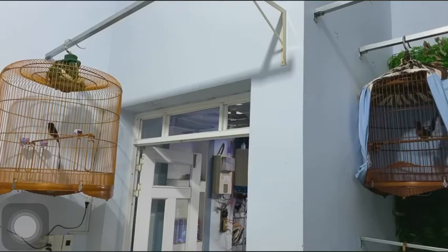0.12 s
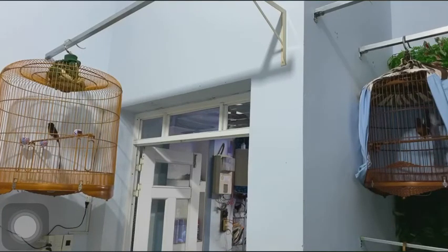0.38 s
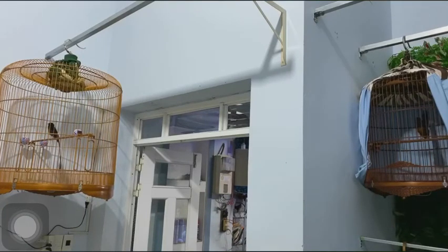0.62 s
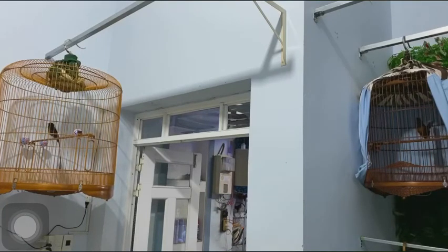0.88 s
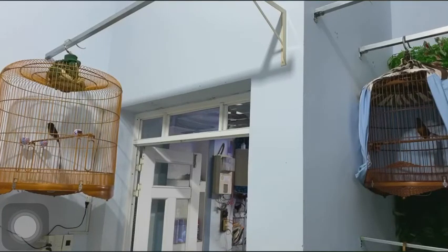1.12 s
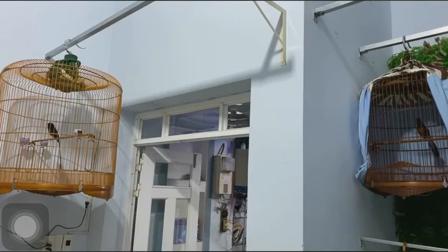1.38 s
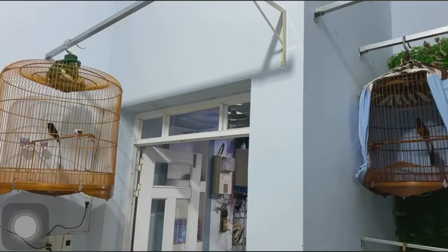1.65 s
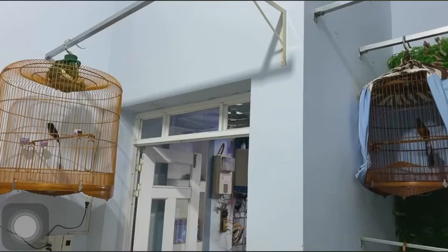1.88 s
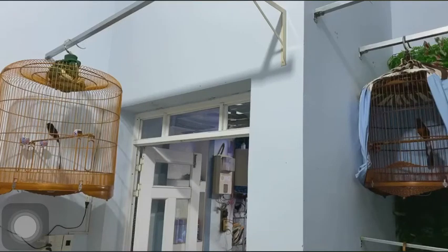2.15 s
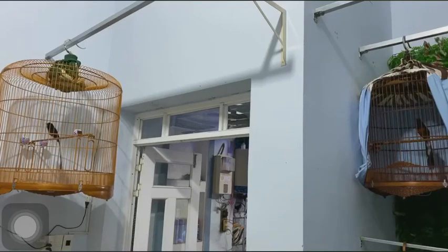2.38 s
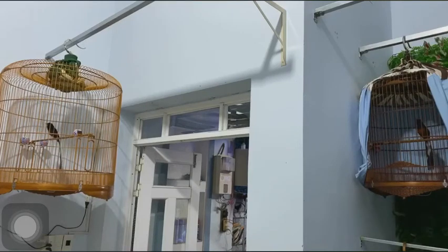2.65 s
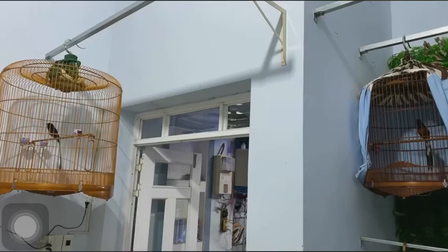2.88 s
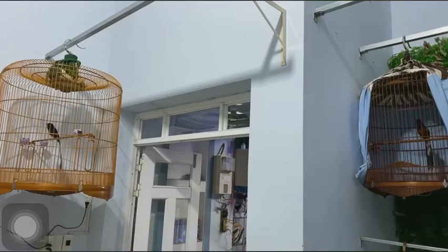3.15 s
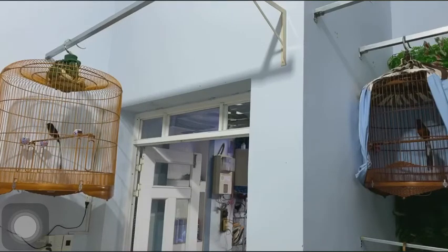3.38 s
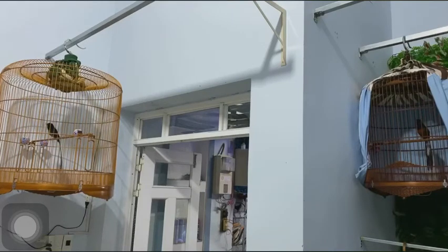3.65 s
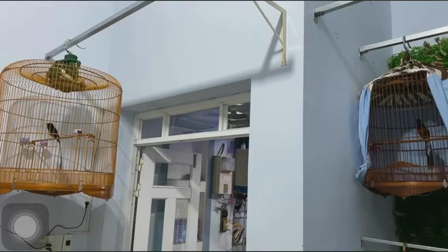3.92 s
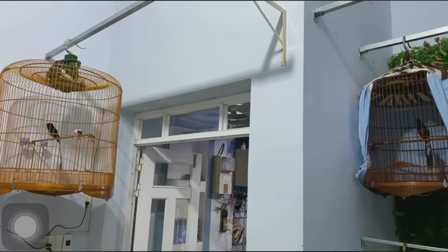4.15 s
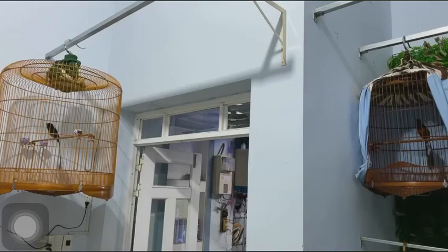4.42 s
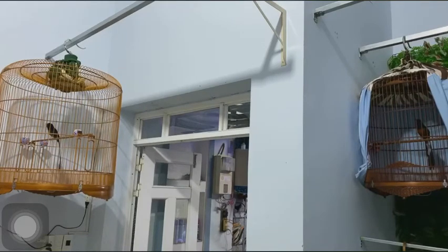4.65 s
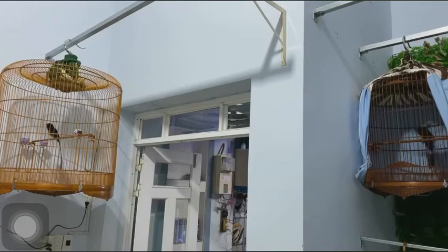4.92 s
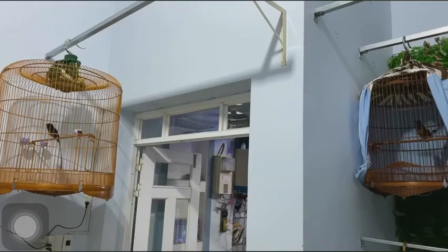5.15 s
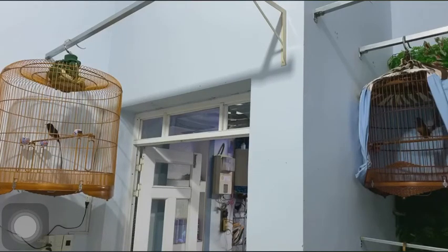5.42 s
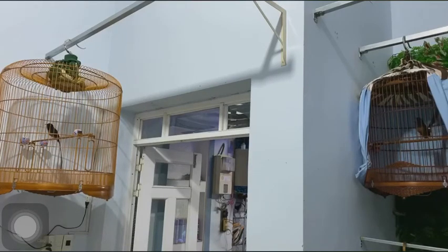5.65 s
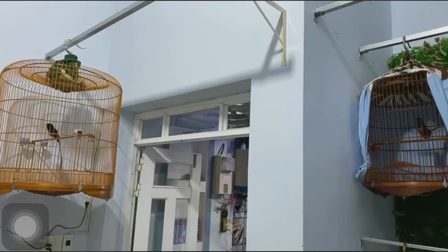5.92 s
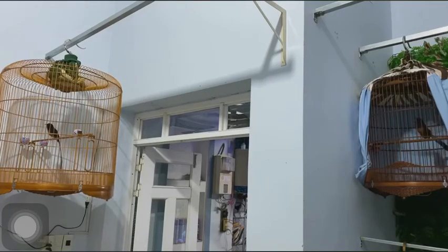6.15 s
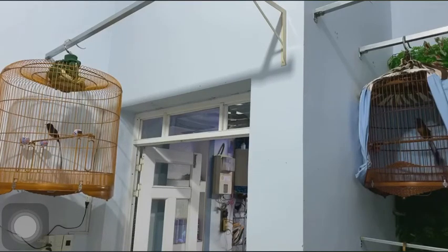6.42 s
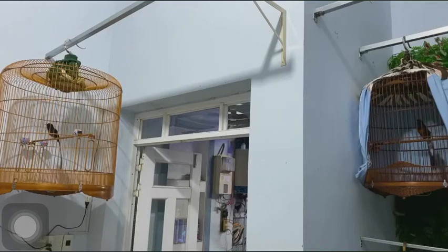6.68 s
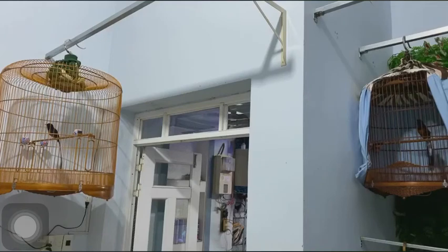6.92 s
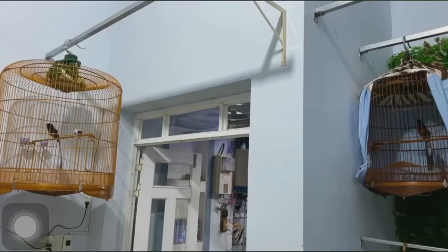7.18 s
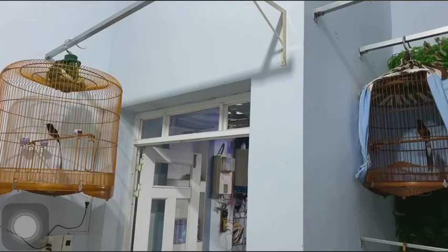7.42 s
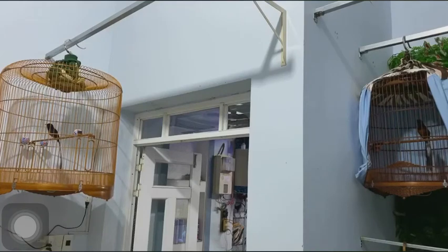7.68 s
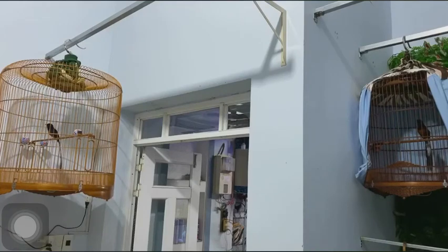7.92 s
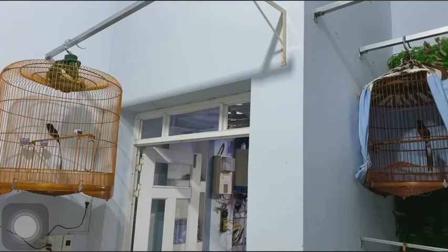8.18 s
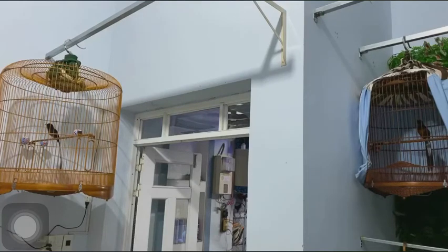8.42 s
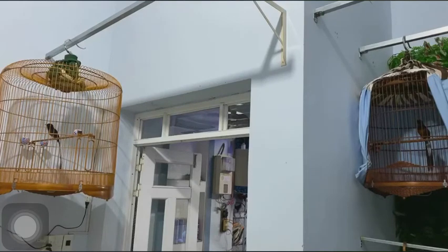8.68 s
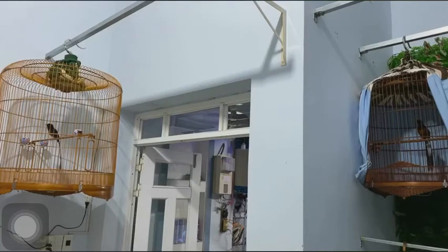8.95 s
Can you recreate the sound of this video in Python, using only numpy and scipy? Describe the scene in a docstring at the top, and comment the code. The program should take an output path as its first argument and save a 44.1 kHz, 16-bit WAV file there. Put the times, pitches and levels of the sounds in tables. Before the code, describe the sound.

Fast whistled birdsong fills an echoing courtyard, at first mostly mid-pitched chirps and downward slides, later sharper squeaks and harsh churrs. The song thins as a single loud dog bark bounces off the walls, then picks up again with tumbling whistles and rasps. Uneven hollow panel knocks close the scene. Street rumble, distant birds and faint high hiss lie beneath, heard from some distance.

```python
"""Caged songbirds in a hard-walled yard

Gliding sines make the whistles, stacks of partials the nasal notes and sweeps, chopped noise the churrs;
echoes and a tail smear them. A dog barks once as a stack shaped by its muzzle, and six blows ring the
modes of a hollow panel. Banded noise makes the farther birds, the engine drone and traffic in the street,
and a thin high hiss that comes and goes."""
import sys
import numpy as np
from scipy import signal
from scipy.fft import rfft, irfft, next_fast_len
from scipy.io import wavfile
from scipy.ndimage import map_coordinates

SR = 44100
rng = np.random.default_rng(int(sys.argv[2]) if len(sys.argv) > 2 else 0)


def store_wav(level_fs):
    """Save 16-bit WAV to argv[1]."""
    pcm = np.round(np.clip(np.atleast_2d(level_fs), -1, 1) * 32767)
    wavfile.write(sys.argv[1], SR, pcm.T.astype(np.int16))


def nominal_scale(level):
    """Amplitude ratio for a level in decibels (scalar or array-like)."""
    x = np.asarray(level, float) / 20
    return 10 ** x


N = 399546

ATTACK_S, RELEASE_S = 0.006, 0.0056  # soft edges of a whistle


def unit(x):
    """Scaled to rms 1."""
    return x / np.sqrt(np.mean(x ** 2) + 1e-20)


def along(points, hz):
    """(Hz, value) points read on a log frequency axis."""
    f, v = np.transpose(points)
    return np.interp(np.log(hz + 1), np.log(f + 1), v)


def wobble(rate, size=N):
    """A smooth random curve, rate knots a second."""
    knots = rng.standard_normal(int(size * rate / SR) + 4)
    return map_coordinates(knots, [np.arange(size) * rate / SR])


def filtered(x, response):
    """x times a response of frequency."""
    m = next_fast_len(len(x) + 8192)
    return irfft(rfft(x, m) * response(np.fft.rfftfreq(m, 1 / SR)), m)[:len(x)]


def resonance(hz, centre_hz, width_hz):
    """Complex gain of one resonance, 1 at its centre."""
    return 1j * hz * width_hz / (centre_hz ** 2 - hz ** 2 + 1j * hz * width_hz + 1e-9)


def swell(t, length, edge):
    """Soft start and soft end of a sound."""
    return np.clip(np.minimum(t, length - t) / edge, 0, 1) ** 2


def add(track, s, sound):
    """Mix a sound in at s seconds."""
    part = track[max(round(s * SR), 0):][:len(sound)]
    part += sound[:len(part)]


def shake(s, t):
    """Pitch swing of a voice that starts at s: a fast uneven shake, deep in rattling passages."""
    # how much the voices rattle: (time [s], depth ahead of the two swing gains [Hz])
    rattle = [(0, 87.5), (2.5, 91), (2.8, 70), (4.5, 81), (4.58, 40), (5.3, 69.4), (5.5, 25), (6.4, 25),
              (6.6, 132), (7.05, 120), (7.1, 46), (7.3, 45), (7.4, 129), (7.9, 133), (8.05, 40), (8.55, 40),
              (8.7, 90)]
    depth_hz = np.interp(s + t, *np.transpose(rattle))
    beat_hz = 70 * (1 + 0.4 * wobble(40, size=len(t)))
    beat = np.sin(2 * np.pi * np.cumsum(beat_hz) / SR + rng.uniform(0, 2 * np.pi))
    return depth_hz * (0.77 * beat + 0.607 * wobble(150.2, size=len(t)))


def whistle(s, glide, db):
    """A gliding, slightly unsteady sine with two weak overtones, from pitch and level at each sample."""
    # second and third partial against the first: level [dB]
    overtone_db = [-32, -36]
    full_shake_hz = 1500  # notes above this pitch shake fully, lower ones less
    t = np.arange(len(glide)) / SR
    pitch = glide + shake(s, t) * np.clip(glide / full_shake_hz, 0, 1)
    phase = 2 * np.pi * np.cumsum(pitch) / SR
    overtones = sum(nominal_scale(d) * np.sin((k + 2) * phase) for k, d in enumerate(overtone_db))
    tone = np.sin(phase) + overtones
    edges = np.clip(np.minimum(t / ATTACK_S, (t[-1] - t) / RELEASE_S), 0, 1) ** 2
    return np.sqrt(2) * nominal_scale(db) * edges * tone


def whistles():
    """Single notes glide from one pitch to another while they fade; bent whistles follow their curves."""
    # single notes: (time [s], length [s], first pitch [Hz], last pitch [Hz], mid-note level [dB])
    notes = [ (0, 0.13, 5320, 4430, -40), (.005, 0.043, 1617, 1553, -25.5),
             (.005, 0.063, 2083, 2080, -31.5), (.01, .11, 1153, 996, -36.5),
             (0.062, 0.034, 2310, 2250, -20.5), (.065, 0.074, 1713, 1627, -27),
             (.095, 0.017, 2040, 2045, -27), (0.116, 0.022, 1420, 1460, -31.5),
             (0.146, 0.078, 1040, 1134, -33), (.23, 0.26, 5880, 4584, -41), (.239, 0.013, 1742, 1736, -21),
             (0.25, 0.067, 1696, 1079, -29.5), (.285, 0.018, 1610, 1524, -27.5),
             (0.342, 0.018, 1075, 1120, -36), (0.352, 0.033, 1740, 1666, -27),
             (0.395, 0.018, 1172, 1195, -30), (0.434, 0.031, 1827, 1610, -28.5),
             (0.458, 0.037, 1148, 1127, -33.5), (0.538, 0.045, 1794, 1602, -28.5),
             (.546, 0.047, 1092, 1162, -29.5), (0.603, 0.068, 4040, 4030, -38.5),
             (.611, 0.021, 1680, 1675, -24), (0.743, .03, 1727, 1600, -25),
             (0.888, 0.029, 1695, 1748, -24.5), (.93, 0.023, 1835, 1900, -31.5),
             (0.974, 0.052, 3480, 4370, -40), (0.987, 0.025, 1977, 2220, -17.5),
             (0.998, 0.024, 1598, 1706, -22), (1.01, 0.036, 1136, 1223, -28),
             (1.13, 0.011, 1830, 1810, -20.5), (1.137, 0.056, 3320, 3370, -42),
             (1.16, 0.029, 2457, 2026, -18), (1.155, 0.029, 2020, 1790, -22.5),
             (1.212, 0.045, 1180, 867, -35), (1.292, 0.028, 2646, 3130, -23.5),
             (1.305, 0.029, 1665, 1578, -25.5), (1.326, 0.066, 2020, 2064, -29),
             (1.333, .03, 2435, 2737, -20.5), (1.33, 0.065, 5920, 4600, -40.5),
             (1.338, 0.023, 1240, 1265, -30), (1.392, 0.022, 1334, 1337, -26),
             (1.498, 0.05, 2000, 1990, -25.5), (1.639, 0.043, 1086, 958, -33),
             (1.75, 0.033, 1864, 1963, -29.5), (1.841, 0.021, 1012, 1026, -29),
             (1.881, 0.031, 970, 787, -35.5), (1.906, 0.084, 1011, 1010, -34.5),
             (1.911, 0.08, 1522, 1508, -32.5), (1.935, 0.062, 1908, 1770, -28.5),
             (1.962, 0.19, 6060, 4540, -42.5), (2.095, 0.07, 1377, 1537, -30),
             (2.099, .1, 2070, 2000, -33.5), (2.13, 0.032, 1098, 1150, -36), (2.115, .07, 2295, 2910, -29),
             (2.216, 0.079, 1136, 1248, -32), (2.35, 0.071, 1121, 1151, -29.5),
             (2.383, 0.038, 1371, 1450, -31.5), (2.554, 0.064, 1440, 1466, -33),
             (2.583, .075, 1077, 1170, -30.5), (2.782, 0.029, 1334, 1350, -30),
             (2.787, 0.073, 1110, 1113, -32.5), (2.938, 0.021, 1120, 1142, -24.5),
             (3.0, 0.028, 1127, 1150, -35), (3.062, 0.089, 1190, 1120, -31),
             (3.201, 0.016, 1450, 1266, -27), (3.244, 0.05, 1462, 1405, -34),
             (3.272, 0.049, 1087, 1109, -30.5), (3.43, 0.1, 1136, 1119, -34),
             (3.456, .025, 2114, 1094, -28.5), (3.465, 0.056, 1360, 1538, -30),
             (3.547, 0.074, 1515, 1520, -31.5), (3.695, 0.042, 1675, 1657, -28.5),
             (3.784, 0.024, 1164, 893, -34.5), (3.809, 0.034, 1718, 1600, -27),
             (3.892, 0.056, 1805, 1580, -29), (3.943, 0.088, 1940, 1680, -27),
             (3.968, 0.041, 1960, 2050, -33), (3.98, .05, 1560, 1299, -27),
             (4.097, 0.028, 1674, 1624, -25.5), (4.121, .04, 1600, 1758, -30.5),
             (4.175, .055, 1718, 1802, -20), (4.18, 0.0395, 3200, 3570, -35), (4.3, .02, 2810, 2510, -29),
             (4.242, 0.1, 957, 700, -45), (4.26, 0.085, 2086, 2020, -32.5), (4.38, 0.062, 1906, 1496, -45),
             (4.465, 0.078, 1087, 1100, -32.5), (4.534, 0.018, 1364, 1360, -29.5),
             (4.577, 0.0099, 1430, 1540, -29), (4.59, .03, 2745, 2483, -24), (4.638, .045, 3800, 3000, -31),
             (4.72, 0.019, 3720, 3580, -27), (4.752, 0.057, 3510, 2400, -37),
             (5.401, 0.052, 3570, 4540, -39.5), (5.412, 0.047, 2540, 2990, -38.5),
             (5.75, 0.067, 829, 1136, -37.5), (5.859, 0.022, 1583, 1510, -30),
             (5.895, 0.11, 1006, 1125, -40), (6.095, 0.057, 1072, 1272, -32),
             (6.262, 0.057, 1200, 1410, -31.5), (6.392, 0.0413, 854, 1480, -30.5),
             (6.521, .1, 1098, 1348, -36), (6.604, .033, 2440, 2435, -34),
             (6.631, 0.093, 1500, 1612, -36.5), (6.688, .045, 1183, 1148, -34.5),
             (6.798, 0.11, 1042, 1362, -38), (6.931, 0.086, 1450, 1088, -36.5),
             (7.115, .03, 1783, 1666, -26.5), (7.2, 0.089, 1307, 1146, -43),
             (7.362, .08, 1054, 1096, -39.5), (7.62, 0.042, 1500, 1230, -39.5),
             (7.632, .03, 2280, 2300, -42), (7.787, 0.029, 1910, 1916, -41.5),
             (7.952, 0.013, 1183, 1174, -28), (8.02, 0.022, 933, 910, -31), (8.054, 0.047, 1160, 1230, -36),
             (8.053, 0.11, 987, 964, -27), (8.02, .03, 1900, 1900, -39), (8.109, .06, 1950, 1936, -37),
             (8.183, .035, 1690, 2410, -24.5), (8.266, 0.0061, 2280, 2320, -24),
             (8.319, 0.025, 2145, 2390, -27.5), (8.319, 0.25, 960, 970, -31.5),
             (8.333, 0.042, 1883, 2522, -19), (8.37, 0.048, 2068, 2100, -29),
             (8.47, 0.037, 1500, 1770, -40.5), (8.627, 0.076, 3474, 3454, -42),
             (8.749, 0.036, 2290, 3150, -33.5), (8.784, 0.028, 1072, 1225, -30.5),
             (8.857, 0.017, 1790, 1770, -33), (8.9, 0.044, 1930, 1670, -54),
             (8.982, 0.041, 3070, 3150, -41)]
    # bent whistles, one table each: (time [s], pitch [Hz], level [dB])
    phrases = [
        [(.675, 2100, -38), (.71, 1795, -21), (.735, 1402, -23), (.76, 1173, -22.5)],
        [(.782, 3180, -30), (.792, 2647, -19.5), (.815, 2286, -26), (.85, 2160, -38), (.93, 2148, -30)],
        [(.93, 1557, -20), (.97, 1300, -30), (1.025, 1093, -26.5), (1.05, 832, -35.5)],
        [(1.15, 1692, -21), (1.175, 1486, -23.5), (1.2, 1033, -20.5)],
        [(1.61, 2000, -27.5), (1.64, 1865, -18.5), (1.68, 1663, -23.5)],
        [(1.73, 5580, -35.5), (1.77, 4230, -25.5), (1.79, 3300, -38), (1.8, 2440, -29)],
        [(2.075, 3540, -40), (2.086, 2880, -25.5), (2.1, 2100, -36)],
        [(2.2, 3530, -40), (2.245, 3770, -35.5), (2.27, 4220, -24)],
        [(3.15, 2080, -48), (3.19, 1995, -23), (3.23, 1394, -35)],
        [(7.512, 2024, -25), (7.54, 1873, -22.5), (7.555, 1500, -25), (7.57, 1330, -26)],
        [(7.918, 1136, -27.5), (7.94, 1598, -23), (7.97, 1646, -32.5)],
        [(8.705, 2094, -15.5), (8.72, 1774, -11.5), (8.76, 1803, -30.5), (8.8, 2060, -14.5)],
        [(1.378, 3350, -16.5), (1.41, 3770, -28), (1.46, 4000, -27.5), (1.485, 4600, -21), (1.502, 5820, -20)],
        [(2.55, 5144, -28.5), (2.7, 4502, -30.5), (2.955, 4370, -29.5), (2.968, 3530, -34), (2.985, 2630, -34)],
        [(2.71, 2024, -29.5), (2.75, 2139, -27.5), (2.82, 2074, -27), (2.86, 1760, -26.5)],
        [(4.6, 1900, -28), (4.65, 2410, -21.5), (4.73, 2570, -29)],
        [(5.5, 2003, -45.5), (5.6, 1917, -35), (5.68, 1673, -25), (5.76, 1531, -24.5)],
        [(7.1, 1777, -25), (7.11, 1961, -24.5), (7.13, 2030, -24), (7.2, 1760, -23)],
    ]
    # a held note that tumbles to a lower one: (time after its start [s], pitch [Hz], level [dB])
    figure = [(0, 2540, -41), (.04, 2641, -23.5), (.085, 2653, -28), (.115, 2086, -26.5),
              (.14, 1898, -24.5), (.19, 1900, -26.5)]
    # the figure is sung twice: start [s]
    figure_starts = [5.93, 6.18]
    drop_bend, rise_bend = 1.4, 1.037  # over 1: the glide is fast at first and then levels off
    fade_db = 4.5  # level lost along a single note
    out = np.zeros(N)
    for s, length, first_hz, last_hz, db in notes:
        left = np.linspace(1, 0, round((length + ATTACK_S) * SR))
        bend = drop_bend if first_hz > last_hz else rise_bend
        glide = last_hz + (first_hz - last_hz) * left ** bend
        add(out, s - ATTACK_S, whistle(s, glide, db + fade_db * (left - 0.5)))
    for rows in phrases + [np.add(figure, [start, 0, 0]) for start in figure_starts]:
        s, hz, db = np.transpose(rows)
        t = np.arange(s[0] - ATTACK_S, s[-1], 1 / SR)
        add(out, t[0], whistle(s[0], np.interp(t, s, hz), np.interp(t, s, db)))
    return out


def nasal_notes():
    """Stacks of partials, strongest near a throat resonance and a low windpipe one; sweeps are made alike."""
    # nasal notes, the highest nearly pure:
    # (time [s], length [s], first pitch [Hz], throat resonance [Hz], level [dB])
    nasal = [(3.797, .03, 1016, 4380, -28.5), (3.815, .039, 2560, 5100, -16.5),
             (3.932, .035, 1980, 5330, -24.5), (4.008, 0.02, 1757, 5320, -16.5),
             (4.086, .026, 1670, 5370, -24.5), (4.14, .025, 1653, 5000, -30.5),
             (4.486, .04, 2070, 4050, -29.5), (4.909, .05, 1093, 5660, -28.5),
             (5.078, .055, 1090, 5630, -29.5), (5.233, 0.055, 1123, 5930, -28.5),
             (6.615, 0.04, 1620, 4030, -24.5), (6.811, .011, 1168, 5700, -21.5),
             (6.824, .06, 4720, 4750, -17.5), (6.868, .06, 2736, 4270, -25.5),
             (7.215, .054, 1614, 4150, -27.5), (7.43, 0.011, 5160, 5100, -17.5),
             (7.436, .028, 1406, 4430, -23.5), (7.461, 0.027, 4960, 4830, -13),
             (7.621, 0.1, 5910, 6000, -21.5), (7.627, 0.033, 2535, 4970, -28.5)]
    # second partials of two rising whistles, then raspy sweeps:
    # (time [s], length [s], first pitch [Hz], last pitch [Hz], level [dB])
    sweeps = [(1.382, 0.085, 7170, 7740, -36.5), (2.207, 0.051, 7000, 7780, -35),
              (4.45, 0.022, 4560, 6070, -16), (4.472, 0.022, 5970, 4713, -17.5),
              (9.005, .05, 6460, 4830, -24.5)]
    sag = 0.0307  # share of its pitch that a nasal note loses
    out, k = np.zeros(N), np.arange(1, 9)[:, None]
    voices = [(s, length, hz, hz * (1 - sag), throat_hz, db) for s, length, hz, throat_hz, db in nasal]
    # the resonance is tuned to the middle of each sweep
    voices += [(s, length, first, last, (first + last) / 2, db) for s, length, first, last, db in sweeps]
    for s, length, first_hz, last_hz, throat_hz, db in voices:
        t = np.arange(round(length * SR)) / SR
        pitch = np.linspace(first_hz, last_hz, len(t)) * (1 + 1.3 * shake(s, t) / throat_hz)
        partial_hz = k * pitch
        throat = np.abs(resonance(partial_hz, throat_hz, 2700)) ** 3.95
        windpipe = 0.49 * np.abs(resonance(partial_hz, 2000, 1200)) ** 2
        treble_rolloff = 1 / (1 + (partial_hz / 7800) ** 12)  # partials fade above about 7.8 kHz
        gains = (throat + 0.086 + windpipe) * treble_rolloff
        stack = np.sum(gains * np.sin(k * 2 * np.pi * np.cumsum(pitch) / SR), axis=0)
        rasp = 1 + 0.43 * wobble(1200, size=len(t))  # turbulent air roughens every cycle
        add(out, s, nominal_scale(db) * unit(rasp * stack) * swell(t, length, 0.0033))
    return out


def churrs():
    """Air noise chopped by a fast uneven flutter, in a wide throat resonance."""
    # harsh churrs: (time [s], length [s], centre [Hz], width of the resonance before squaring [Hz], level [dB])
    bursts = [(0.091, 0.026, 4750, 3150, -32), (0.971, 0.043, 4400, 3180, -37),
              (2.262, .04, 5850, 3950, -32.5), (2.777, 0.059, 6300, 2930, -36),
              (2.963, 0.034, 6830, 2900, -36.5), (3.198, 0.014, 6600, 3970, -39.5),
              (3.444, 0.033, 4600, 4000, -45.5), (3.769, 0.043, 4950, 2900, -28.5),
              (4.203, 0.059, 4900, 3640, -23.5), (4.266, 0.083, 3130, 2620, -27.5),
              (4.455, 0.034, 4860, 1300, -24.5), (4.67, 0.087, 4440, 2350, -29),
              (6.604, 0.047, 3940, 3350, -25.5), (6.79, 0.052, 6140, 2450, -23.5),
              (6.858, 0.065, 4560, 2010, -26.5), (7.039, 0.088, 4750, 2380, -24),
              (7.179, 0.068, 5200, 2600, -24.5), (7.411, 0.053, 5560, 3480, -25),
              (7.597, 0.013, 6140, 2490, -25), (7.624, 0.013, 5440, 1200, -30),
              (7.888, 0.031, 5700, 4120, -31), (9.021, 0.014, 5350, 1500, -28.5)]
    out = np.zeros(N)
    for s, length, centre_hz, width_hz, db in bursts:
        t = np.arange(round(length * SR)) / SR
        flutter_hz = 260 * (1 + 0.34 * wobble(100, size=len(t)))
        flutter = np.cos(np.pi * np.cumsum(flutter_hz) / SR) ** 2  # squaring doubles the half-rate cosine
        air = (0.45 + flutter) * rng.standard_normal(len(t))
        breath = filtered(air, lambda hz: resonance(hz, centre_hz, width_hz) ** 2 / (1 + (hz / 7900) ** 12))
        add(out, s, nominal_scale(db) * unit(breath) * swell(t, length, length / 3))
    return out


def dog():
    """One arched bark: overtones shaped by the muzzle, a little hoarse."""
    # the bark: (time [s], pitch [Hz], level ahead of the muzzle [dB])
    bark = [(5.291, 390, -61), (5.299, 388, -18), (5.319, 470, -7), (5.34, 483, -10), (5.362, 463, -23),
            (5.382, 376.4, -17), (5.398, 321, -24)]
    # the muzzle's response: (frequency [Hz], gain [dB])
    muzzle = [(300, 10.5), (480, 3), (970, -0.5), (1450, -29), (2000, -38), (2900, -21), (3400, -21.5),
              (4500, -42), (7000, -26.5)]
    out, k = np.zeros(N), np.arange(1, 15)[:, None]
    s, hz, db = np.transpose(bark)
    t = np.arange(s[0], s[-1], 1 / SR)
    pitch = np.interp(t, s, hz) * (1 + 0.012 * wobble(300, size=len(t)))
    gains = nominal_scale(along(muzzle, k * pitch))
    stack = np.sum(gains * np.sin(k * 2 * np.pi * np.cumsum(pitch) / SR), axis=0)
    hoarse = 1 + 0.037 * wobble(908, size=len(t))
    add(out, s[0], nominal_scale(np.interp(t, s, db)) * hoarse * stack)
    return out


def knocks():
    """Each blow rings the panel's modes at new strengths, with a dull crack; some reach the main mode better."""
    # blows: (time [s], level of the whole blow [dB], extra level of the main mode [dB])
    blows = [(8.061, -5, 1.5), (8.223, -5, -11), (8.378, -8, -5), (8.564, -4, -4.5), (8.749, -10, -1),
             (8.949, -9.5, -1.5)]
    # modes of the panel: (frequency [Hz], relative level [dB], time to die by 60 dB [s])
    panel = [(216.5, -11.5, 0.046), (317, -12, 0.06), (527, -11, 0.067), (700, -4, 0.027),
             (886, -4.5, 0.046), (960, -2, 0.062), (1183, -12.5, 0.037)]
    out, t = np.zeros(N), np.arange(SR // 2) / SR
    top_db = max(level for _, level, _ in panel)
    for s, db, ring_db in blows:
        ring = np.zeros(len(t))
        for hz, level, t60 in panel:
            mode_db = level + (ring_db if level == top_db else 0) + rng.normal(0, 0.92)
            ring += nominal_scale(mode_db - 60 * t / t60) * np.sin(2 * np.pi * hz * t)
        crack = nominal_scale(-17.5 - 60 * t / 0.01) * rng.standard_normal(len(t))
        onset = 1 - np.exp(-t / 0.0023)
        add(out, s - 0.003, nominal_scale(db) * onset * (ring + crack))
    return out


def yard(x, wet_db, gap):
    """Direct sound, then after gap seconds a wall's echo and a tail whose frequencies die at their own speeds."""
    # decay of the yard: (frequency [Hz], time to die by 60 dB [s])
    decay = [(300, 0.98), (1000, 0.88), (2500, 0.69), (5000, 0.66), (9000, 0.66)]
    hz, t, z = signal.stft(rng.standard_normal(SR), SR, nperseg=256)
    tail = signal.istft(z * nominal_scale(-60 * t / along(decay, hz)[:, None]), SR, nperseg=256)[1]
    tail = np.pad(tail, (round(gap * SR), 0))
    wall = nominal_scale(-6.5) * np.pad(x, (round(gap * SR), 0))[:N]
    return x + wall + nominal_scale(wet_db) * signal.fftconvolve(x, tail / np.linalg.norm(tail))[:N]


def far_chatter():
    """Farther birds blur into a lumpy band of noise."""
    # level ahead of the random lumps: (time [s], level [dB])
    chatter = [(0, -39), (2, -37.5), (3.6, -44), (4.6, -45), (5.5, -55), (6.8, -42), (9.06, -48.5)]
    level_db = np.interp(np.arange(N) / SR, *np.transpose(chatter))
    band = unit(filtered(rng.standard_normal(N), lambda hz: resonance(hz, 1336, 1100) ** 2))
    return nominal_scale(level_db + 3.5 * wobble(12)) * band


def street():
    """A wavering engine drone, broad traffic noise and a thin high hiss, each a shaped noise."""
    # levels: (time [s], drone level [dB], level of the traffic's 130-380 Hz part [dB])
    levels = [(0.0, -38.5, -42.5), (0.8, -42.5, -42), (1.82, -47.5, -47.5), (2.87, -50, -42.5),
              (4.36, -37, -40), (5.12, -38.5, -44), (5.55, -32, -46), (5.85, -32, -40), (7.95, -34, -42.5),
              (8.23, -37, -41), (9.06, -39.5, -44.5)]
    # drone spectrum, closed off above: (frequency [Hz], relative level per Hz [dB])
    drone_shape = [(40, -21.5), (60, -14), (82, 5), (100, 1), (125, -5.5), (170, -16)] + [(400, -84)]
    # traffic spectrum: (frequency [Hz], relative level per Hz [dB])
    traffic_shape = [(40, -34), (80, -11), (150, 2), (300, -4), (600, -10), (1200, -5), (2500, -14.5),
                     (5000, -19.5), (9000, -27.5)]
    # swells of the hiss: (time [s], length [s], level ahead of its flicker [dB])
    hiss_swells = [(-.1, 1.49, -48), (1.475, .16, -46.5), (2.715, 0.27, -44.5), (3.147, 1.2, -52),
                   (4.513, .16, -49), (6.777, 0.061, -59.5), (7.11, 0.16, -51.5), (7.356, 0.19, -50),
                   (7.864, 0.24, -52.5)]
    traffic_gain_db = 4.5  # the whole traffic noise over its 130-380 Hz part
    t = np.arange(N) / SR

    def noise(response):
        return unit(filtered(rng.standard_normal(N), response))

    s, *curves = np.transpose(levels)
    drone_db, traffic_db = [np.interp(t, s, curve) for curve in curves]
    drone = nominal_scale(drone_db) * noise(lambda hz: nominal_scale(along(drone_shape, hz)))
    traffic_gain = nominal_scale(traffic_db + traffic_gain_db + 1.6 * wobble(4))
    traffic = traffic_gain * noise(lambda hz: nominal_scale(along(traffic_shape, hz)))
    swells = sum(nominal_scale(db) * swell(t - start, length, 0.035) for start, length, db in hiss_swells)
    hiss = swells * nominal_scale(2.7 * wobble(7.5)) * noise(lambda hz: resonance(hz, 8410, 510) ** 2)
    return drone + traffic + hiss


def scene():
    """Birds, dog and knocks each echo in the yard in their own way; far birds and street are added as they are."""
    birds = yard(whistles(), wet_db=5.5, gap=0.006)
    birds += yard(nasal_notes() + churrs(), wet_db=2.5, gap=0.006)
    bark = yard(dog(), wet_db=-7.5, gap=0.026)
    blows = yard(knocks(), wet_db=0.0, gap=0.013)
    return (birds + bark + blows + street() + far_chatter())[None]


def band_limit(x):
    """A steep low-pass at the top of the band."""
    return signal.sosfilt(signal.butter(12, 9110, fs=SR, output="sos"), x)


def record(dry):
    """The microphone drops the deep bass; loud peaks are rounded off; nothing is kept above the band limit."""
    top_hz, bass_hz = 8980, 45
    soft = dry[0] / (1 + np.abs(dry[0] / 0.95) ** 6) ** (1 / 6)
    kept = filtered(soft, lambda hz: 1 / (1 + (hz / top_hz) ** 200) / (1 + (bass_hz / (hz + 1)) ** 4))
    return band_limit(kept[None])


dry = scene()
out = record(dry)
store_wav(out)
```